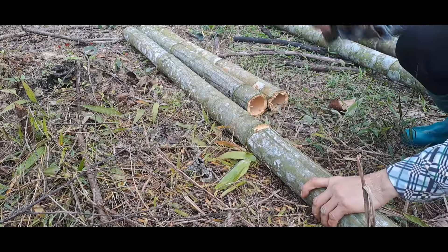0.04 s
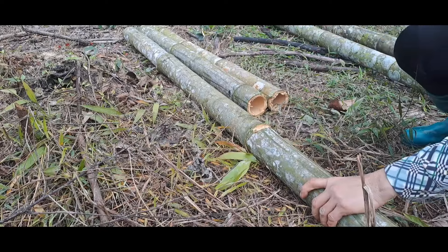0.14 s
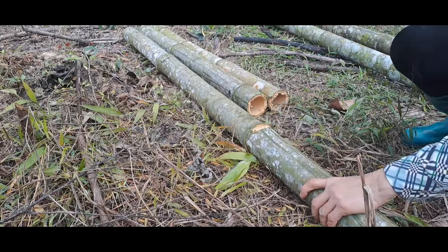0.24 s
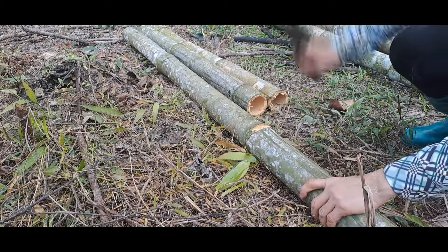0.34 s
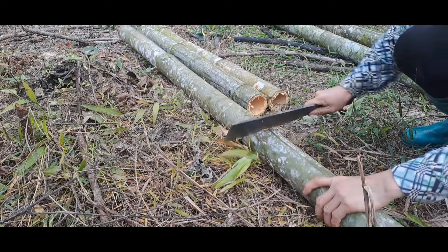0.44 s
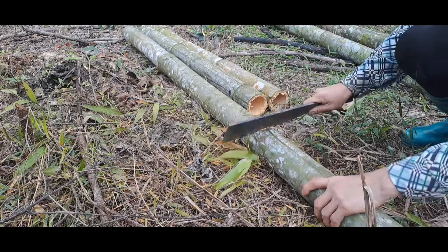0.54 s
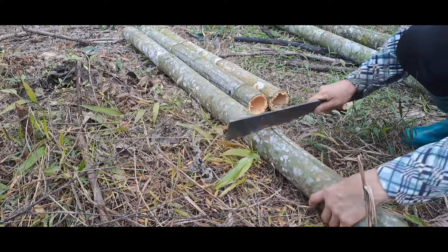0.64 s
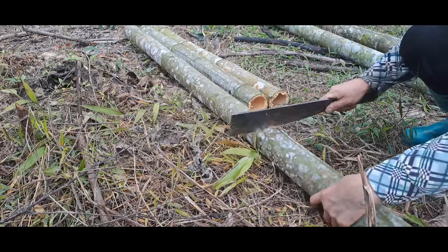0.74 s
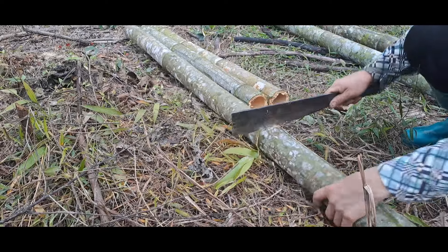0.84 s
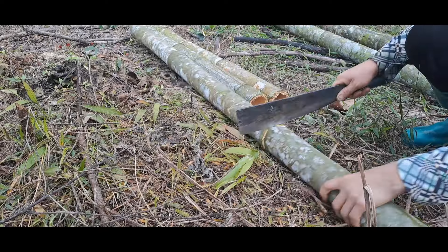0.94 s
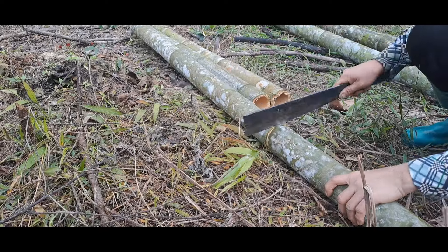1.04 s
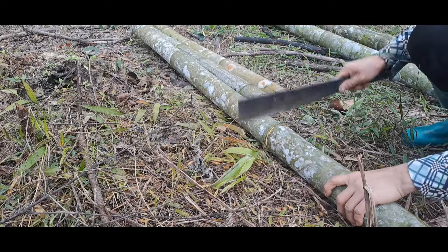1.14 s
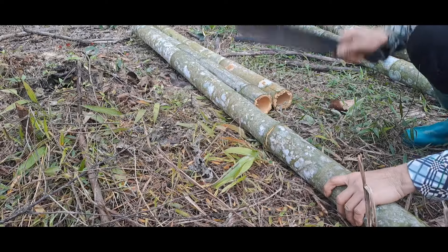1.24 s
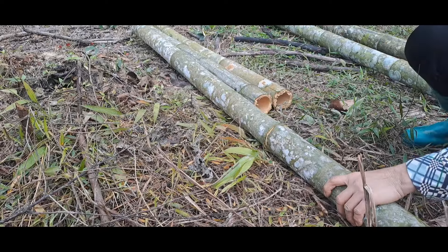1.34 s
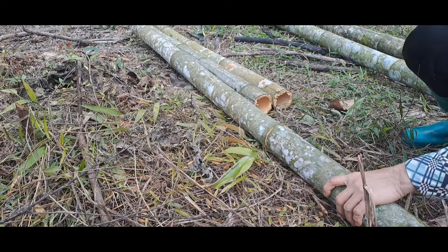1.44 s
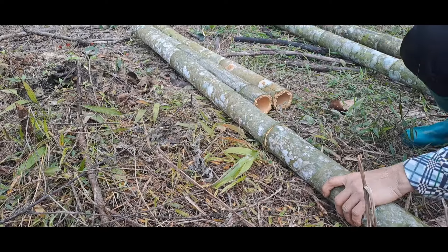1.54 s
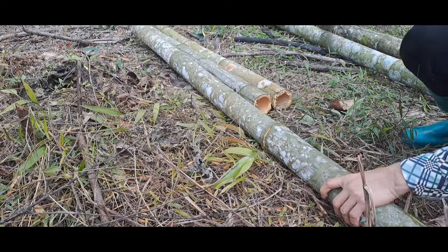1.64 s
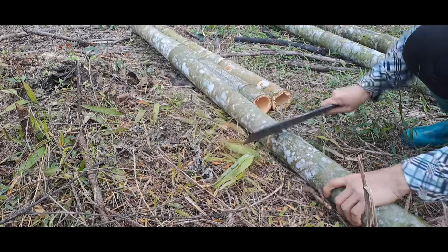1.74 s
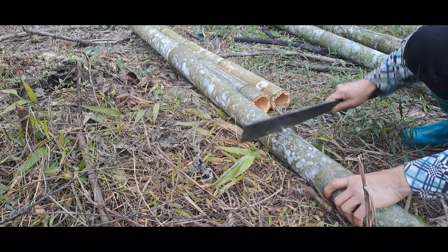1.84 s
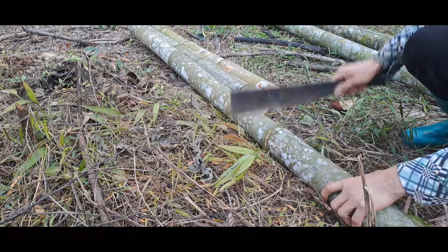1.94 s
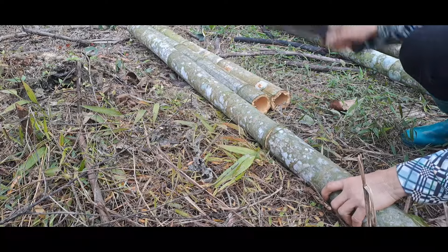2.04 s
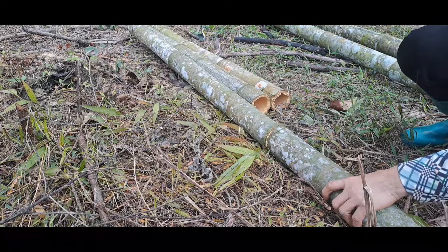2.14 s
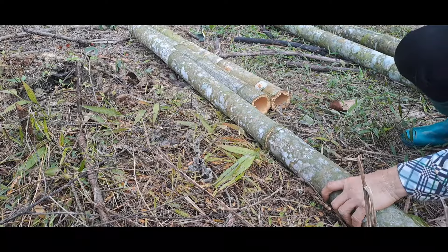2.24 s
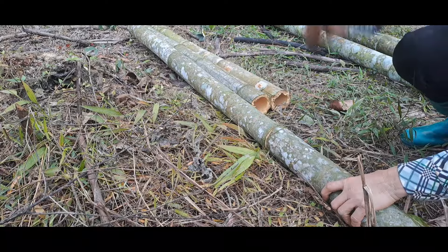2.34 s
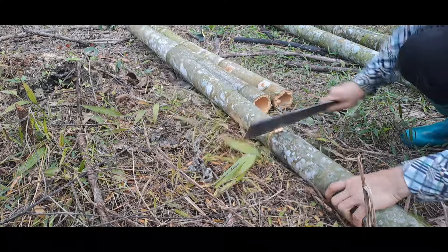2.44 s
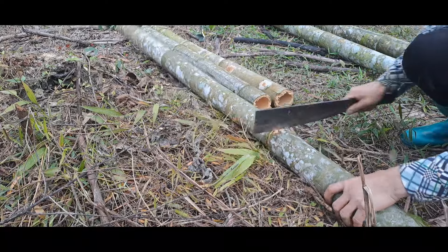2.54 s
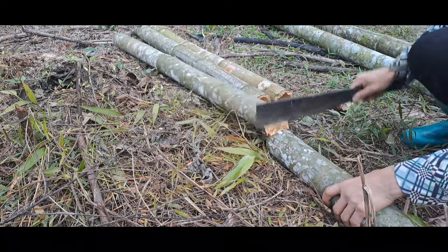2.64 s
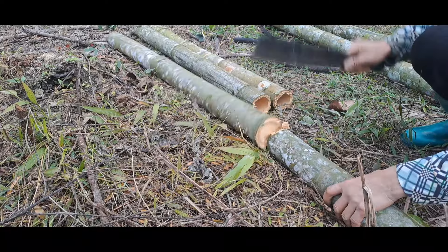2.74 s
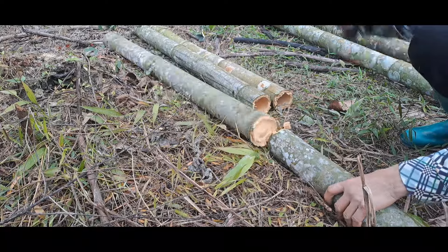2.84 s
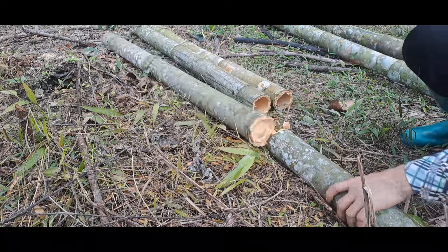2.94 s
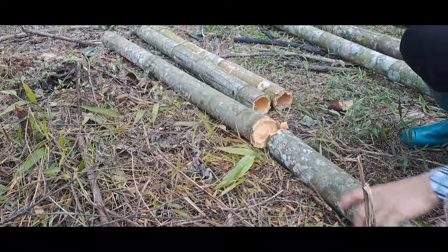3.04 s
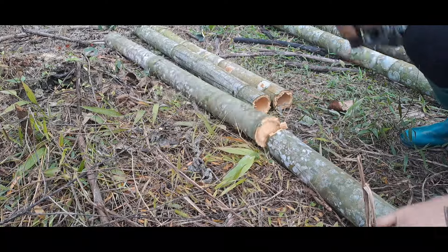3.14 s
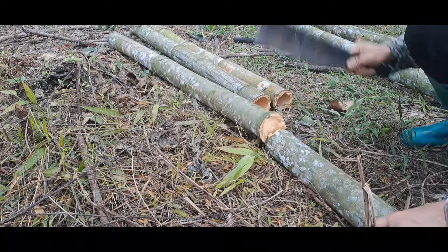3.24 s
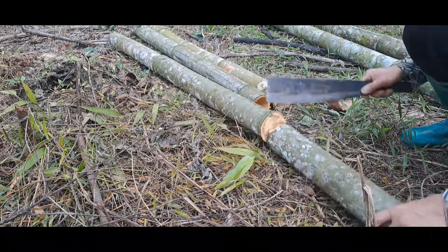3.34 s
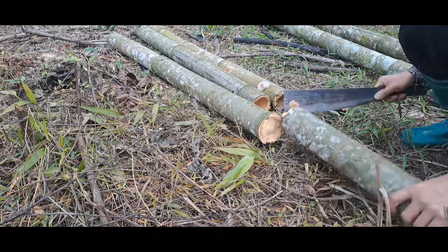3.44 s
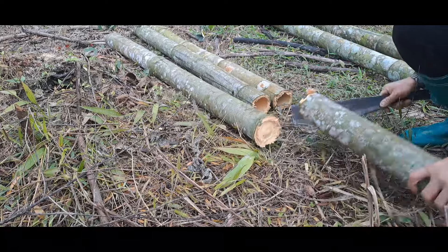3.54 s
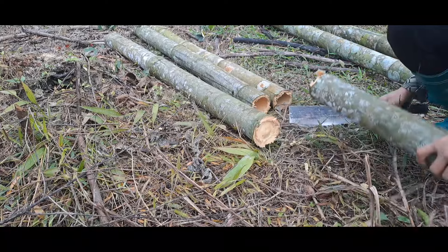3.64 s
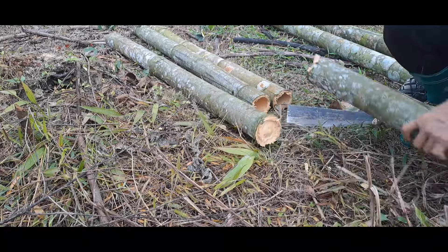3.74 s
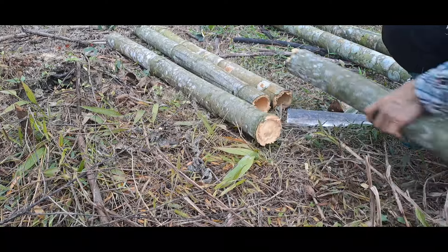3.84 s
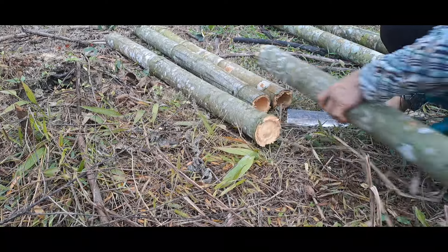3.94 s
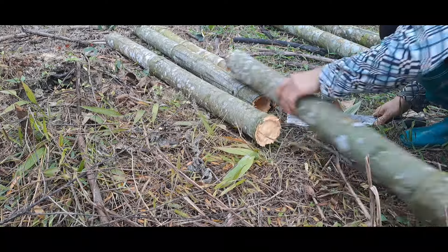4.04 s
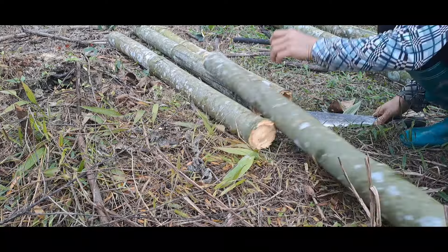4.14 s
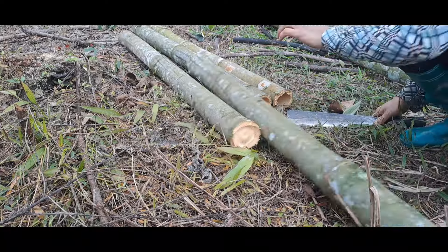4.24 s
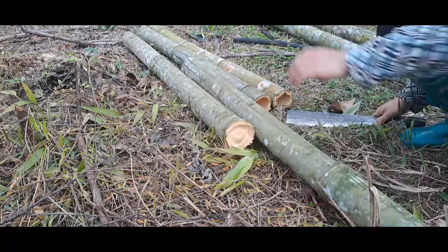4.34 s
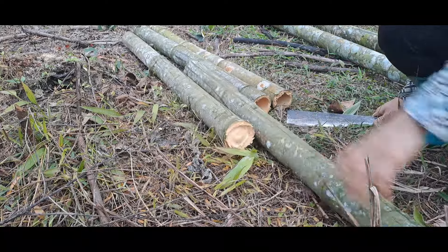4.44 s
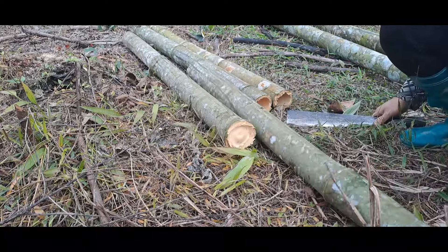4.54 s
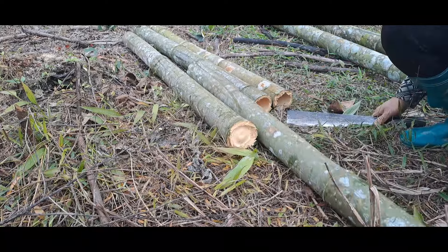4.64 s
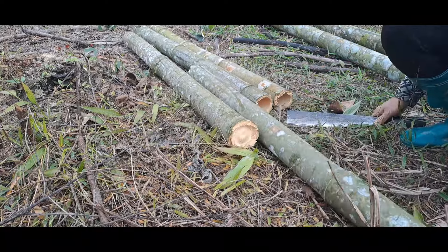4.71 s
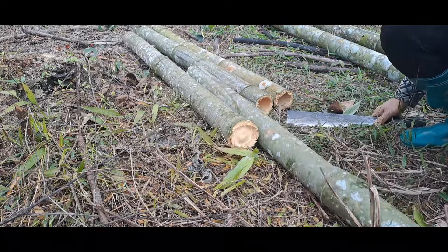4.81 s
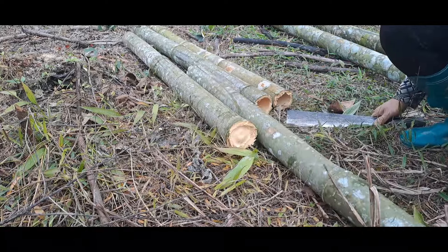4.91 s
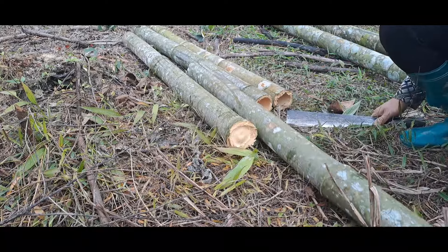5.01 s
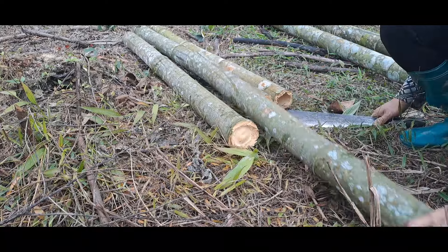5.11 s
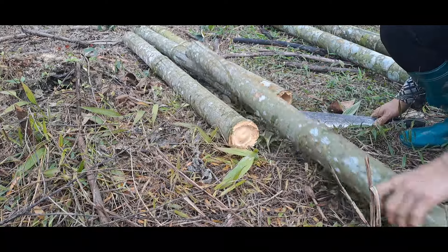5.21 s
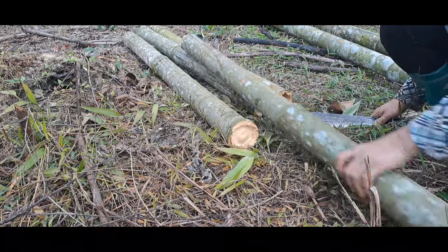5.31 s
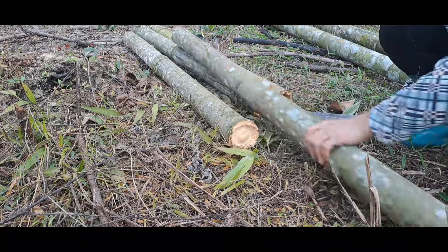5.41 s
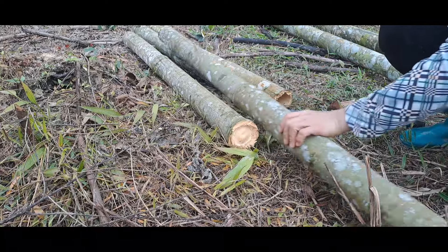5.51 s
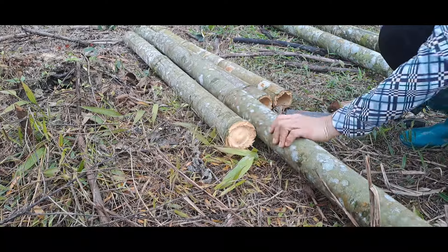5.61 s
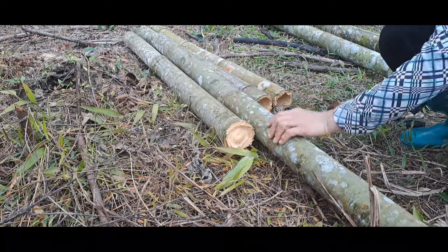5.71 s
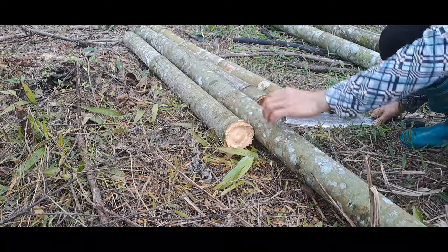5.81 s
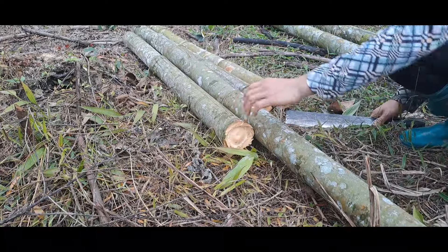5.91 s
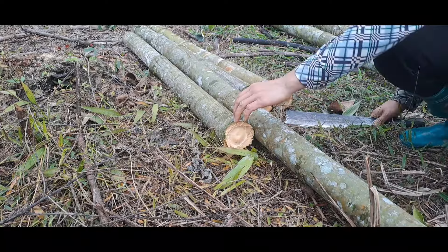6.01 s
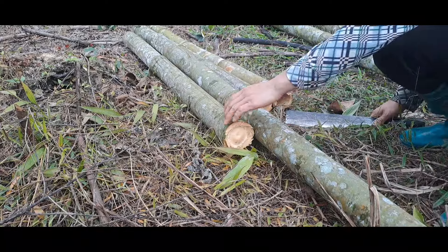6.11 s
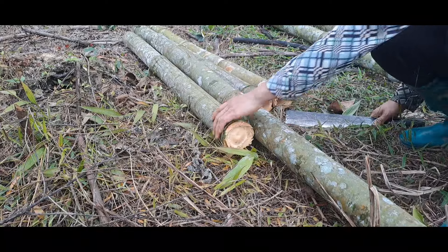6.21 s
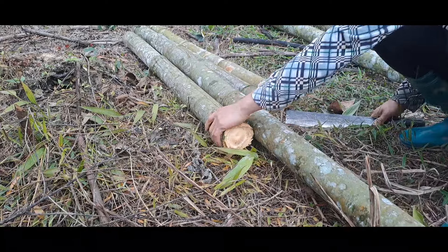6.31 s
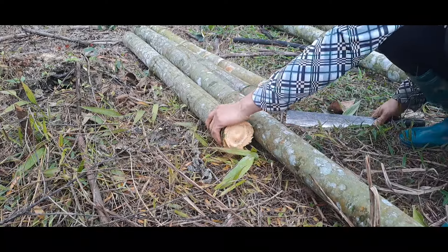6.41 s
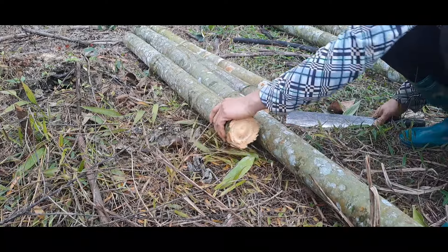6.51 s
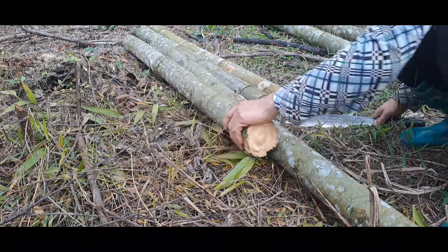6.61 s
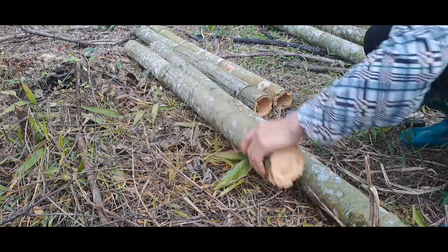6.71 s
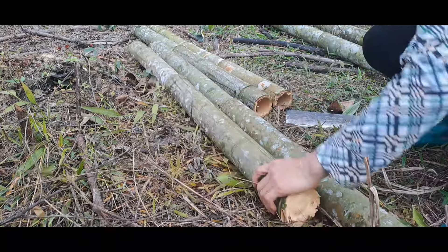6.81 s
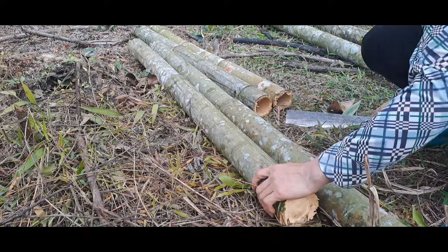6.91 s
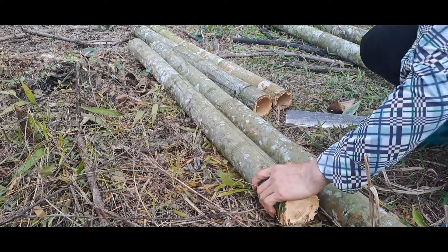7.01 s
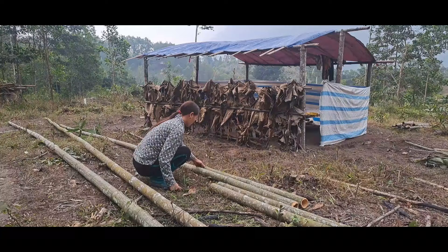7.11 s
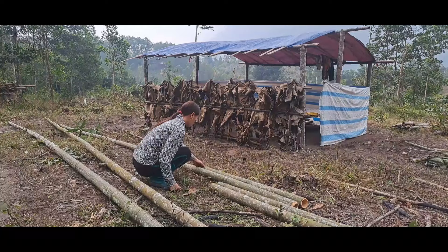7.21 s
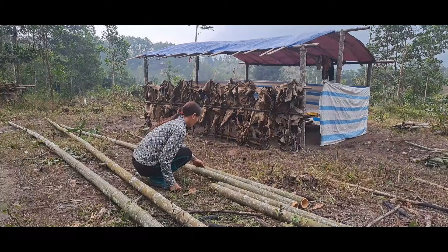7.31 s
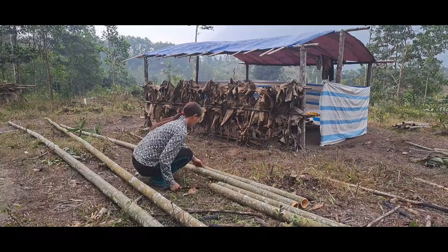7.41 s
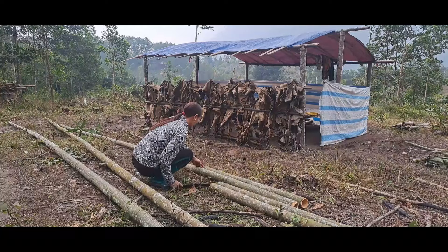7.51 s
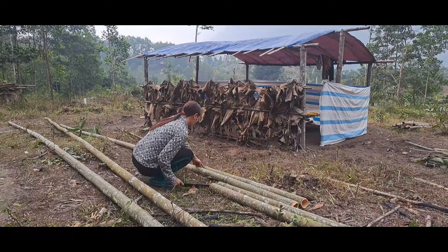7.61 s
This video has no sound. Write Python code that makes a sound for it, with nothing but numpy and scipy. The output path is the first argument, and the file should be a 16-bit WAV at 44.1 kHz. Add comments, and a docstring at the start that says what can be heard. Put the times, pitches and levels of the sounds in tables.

```python
"""Still outdoor air and insect hiss lie under a stir of leaves; then a machete chops a green bamboo pole.
Each blow cracks the skin and tears fibres as shaped noise; decaying modes ring the wall and the hollow tube.
The cut length then clatters, rubs and slides on the pile: ticks, modal knocks, stick-slip trains and scrape.
Dry leaves and stalks crackle as modulated noise and pings, twigs snap as short noise bursts,
and the slope returns a faint wash by convolution with decaying noise."""
import sys
import numpy as np
from scipy import signal
from scipy.fft import rfft, irfft, next_fast_len
from scipy.io import wavfile

SR = 44100
rng = np.random.default_rng(int(sys.argv[2]) if len(sys.argv) > 2 else 0)


def dump(signal):
    """Clip the signal to [-1, 1] and save it as 16-bit WAV at the path in sys.argv[1]."""
    limited = np.clip(np.atleast_2d(signal).T, -1, 1)
    pcm = np.round(limited * 32767).astype(np.int16)
    wavfile.write(sys.argv[1], SR, pcm)


N = 337806
TIME = np.arange(N) / SR  # s, whole scene
AGE = np.arange(24576) / SR  # s since an event; a struck sound is computed for this long

# Background
# spectrum of still outdoor air: frequency_hz, level_db_per_hz
AIR_COLOUR = [(25, -18), (55, -9), (90, -7.5), (230, -11), (450, -20.5), (1000, -26), (2000, -23.5),
              (4000, -21), (5400, -27.5), (10000, -33), (15500, -41.5)]
# spectrum of the steady hiss of distant insects: frequency_hz, level_db_per_hz
INSECT_COLOUR = [(5600, -20), (6400, -3.5), (6850, 2.5), (7300, -4.5), (8000, -19.5)]
AIR_DB, INSECTS_DB = -74, -80.5
# faint tones that slide upward: start_s, length_s, start_hz, end_hz, level_db
RISING_TONES = [(1.579, 0.087, 378, 540, -60), (7.557, 0.11, 270, 806, -64)]
# colour of the left port against the right: frequency_hz, left_minus_right_db
PORT_COLOUR = [(30, 1.4), (150, 0.45), (300, 0.3), (550, 2.7), (1100, -0.8), (2200, -1.7), (4500, -2),
               (8000, -1.5), (12000, -4), (16000, 3.5)]
TOP_HZ = 15700

# Leaf litter and sliding
# pushes that stir the litter as the pole is jolted, lifted, slid or rolled; the drives precede the litter mix:
# full_strength_s, attack_s, hold_s, release_s, leaves_drive_db, scrape_drive_db
LITTER_PUSHES = [(0, .05, 0, .17, -54.5, -72), (.72, .2, .05, .38, -60.5, -61),
                 (1.18, .15, .05, .2, -64, -72), (1.5, .2, .1, .3, -73.5, -90),
                 (1.92, .08, .02, .16, -47.5, -52), (2.6, .08, .07, .11, -47, -54),
                 (2.8, .1, .02, .35, -62, -70), (3.04, .15, .06, .25, -62.5, -68),
                 (3.25, .16, .01, .1, -53.5, -72), (3.56, .2, .03, .3, -62, -67),
                 (3.77, .35, .2, .3, -56, -51), (4.08, .5, .08, .15, -50.5, -40.5),
                 (4.21, .12, .03, .2, -37.5, -36), (4.67, .5, .22, .25, -54, -57),
                 (5.14, .22, .1, .2, -51.5, -46), (5.36, .13, .05, .24, -45.5, -40.5),
                 (5.54, .1, .22, .17, -51.5, -41.5), (5.85, .1, .08, .2, -63, -66),
                 (6.1, .22, .08, .12, -51.5, -57), (6.3, .08, .05, .2, -57, -62),
                 (6.68, .27, .01, .14, -42.5, -43), (6.86, .13, .04, .2, -43, -48),
                 (7.2, .2, .1, .2, -56, -72), (7.62, .5, .04, .2, -65, -80)]
PUSH_RANGE_DB = 20  # rise over the attack, and fall over the release
SHAKE_DB, SHAKE_T60_S = -53, .85  # leaf drive after a chop, relative to its crack, and its decay
STRAY_LEAVES_DB = -84  # constant leaf drive
# spectrum of rustling leaves: frequency_hz, level_db_per_hz
LEAF_COLOUR = [(450, -5.5), (800, -6.5), (1200, -7.5), (2000, -4), (4500, -3.5), (7000, -3.5),
               (8400, -10.5), (11700, -4.5), (15500, -11)]
# spectrum of the sliding pole: frequency_hz, level_db_per_hz
SCRAPE_COLOUR = [(30, -23.5), (45, -6.5), (70, 1), (130, -3.5), (200, -1), (320, -3), (480, -3), (760, 1),
                 (1100, -11), (1800, -12.5), (3200, -21.5)]
# sleeve and hand brushing along the pole: start_s, length_s, level_db
CLOTH_BRUSHES = [(3.791, 0.25, -49), (6.055, 0.21, -46.5), (6.824, .13, -46)]
# spectrum of brushing cloth: frequency_hz, level_db_per_hz
CLOTH_COLOUR = [(1500, -12), (4000, -16), (7000, -1.5), (8500, -3), (12000, 3.5), (15500, 2)]
# the cut length rubbing over other poles: start_s, length_s, level_db, wall_pitch_hz, grating_relative_db
POLE_RUBS = [(5.16, .08, -51, 800, 0), (5.314, .06, -37.5, 400, -6), (5.335, .1, -40, 700, 5),
             (5.415, .07, -44, 620, 1), (5.48, .075, -41.5, 1200, 1), (6.535, .06, -51, 760, -3),
             (6.655, .045, -44, 830, 2), (6.865, .05, -45, 380, -2)]
# spectrum of the grating skin: frequency_hz, level_db_per_hz
GRATE_COLOUR = [(500, -8), (1200, -3), (1800, 3), (2300, -3), (3200, -10), (5000, -15), (8000, -28)]
RUB_PER_S, RUB_SPREAD_DB = 450, 16
RUB_DAMPED_SHARE = .35  # pressed poles ring for this share of the free decay time
# dry stalks crushed under a pole: start_s, length_s, level_db, centre_hz
STALK_CRUNCHES = [(3.84, .1, -58, 3000), (4.03, .1, -54, 2400), (4.18, .02, -32, 4000),
                  (4.208, .05, -35, 3000), (4.255, .025, -36, 4500), (4.312, .016, -41, 5200),
                  (5.345, .08, -49, 3600), (6.658, .02, -38, 3500), (6.672, .022, -37, 4000),
                  (6.782, .03, -44, 4800), (6.865, .055, -45, 6000)]
# spectrum of a crushed stalk: multiple_of_centre, level_db_per_hz
STALK_COLOUR = [(.2, -14), (.45, -2), (1, 0), (1.6, -4), (2.1, -16), (3.6, -23)]
CRUNCH_PER_S, CRUNCH_SPREAD_DB, CRUNCH_T60_S = 240, 22, .024

# Snapping
# the loudest twigs and splinters: start_s, level_db (before the lift in snap), centre_hz
TWIG_SNAPS = [(0.513, -35.5, 11000), (1.091, -33, 6200), (1.9695, -29.5, 4800), (2.598, -34, 4410),
              (2.7233, -45, 8470), (2.79, -50, 5500), (4.2137, -30, 5500), (4.26, -31, 5200),
              (4.5326, -44.5, 9000), (4.737, -40, 7500), (7.1108, -48, 3800)]
# slivers parting after each chop: level relative to its crack (before the lift in snap), middle pitch, span, fall
SPLINTER_DB, SPLINTER_HZ, SPLINTER_SPAN_S, SPLINTER_FALL_DB_PER_S = -29, 5500, .34, 90

# Struck pole
# air-column and bending modes of the whole pole: frequency_hz, level_db, t60_s
WHOLE_POLE_MODES = [(81, -11, .6), (135, -15, .35), (186, -5, .5), (209, -4, .48), (250, -3, .16),
                    (294, -3, 0.22), (332, .5, 0.32), (378, -1, .22), (428, -1.5, 0.22), (480, -4, 0.24),
                    (580, -6, .18), (650, -8, .18), (713.7, -7, 0.14), (797, -3, 0.2), (980, -9.5, 0.08),
                    (1330, -12, 0.07), (1414, -10, 0.1), (1560, -13, .1), (1800, -14, .09),
                    (2100, -16, .08), (2450, -18, 0.07), (3080, -14.5, 0.06), (4500, -19.5, .08)]
# modes of the cut length: frequency_hz, level_db, t60_s
CUT_POLE_MODES = [(160, -5.5, 0.3), (228, 1.5, 0.38), (246, -4, .34), (284.2, 0, 0.22), (355, -2, 0.33),
                  (403, -2, 0.25), (440, -3, .3), (516, -10, 0.24), (590, -9, 0.13), (636, -2, 0.16),
                  (705, -5, 0.13), (800, -6.5, .17), (866, -16, 0.14), (1175, -17, 0.16), (1404, -22, 0.06),
                  (1800, -26, 0.08)]
# short-lived wall modes near the struck spot: multiple_of_clack_pitch, level_db, t60_s
WALL_MODES = [(0.572, -8.5, 0.077), (0.799, -1, .11), (1, 0.5, .12), (1.118, -7, 0.12), (1.27, -5.5, 0.069),
              (1.548, -12, 0.099), (2.05, -17, 0.056), (2.7, -21.5, 0.1), (3.601, -22, .07)]
# the hard skin rings briefly at a touch: frequency_hz, level_db, t60_s
SKIN_MODES = [(1175, -3, .06), (1390, 0, .05), (1445, -2, .05), (1780, 0, .045), (1890, -2, .045),
              (2170, -2, .04), (2550, -3, .04), (2870, -3, .035), (3300, -5, .035)]
SKIN_DB = -9  # relative to the tick
# spectrum of a contact tick: frequency_hz, level_db_per_hz
TICK_COLOUR = [(90, -6.5), (300, -5.5), (600, -8.5), (1300, 3), (2000, 2), (3000, -1.5), (5000, -4.5),
               (7000, -8), (9000, -16), (16000, -15.5)]
# ground thud under the whole pole: frequency_hz, level_db_per_hz
WHOLE_THUD_COLOUR = [(20, -32), (38, -15.5), (54, 3), (75, -1), (105, -4.5), (160, 1), (230, -6),
                     (400, -18.5), (1000, -46.5)]
# ground thud under the lighter cut length: frequency_hz, level_db_per_hz
CUT_THUD_COLOUR = [(22, -23.5), (38, -22), (57, -3.5), (80, -4.5), (110, -5.5), (165, -4), (230, -6.5),
                   (400, -17), (1000, -43)]
HELD_T60_S = .22  # the last length is set down in the hand, which shortens its ring
# light knocks of the slide: middle clack pitch, then levels relative to the scrape drive
BUMP_HZ, BUMP_TICK_DB, BUMP_CLACK_DB, BUMP_RING_DB, BUMP_THUD_DB = 760, -11, -7, -5, -13
# hollow sections rung by hard blows: start_s, lower_tone_hz, upper_tone_hz, tones_db, tones_t60_s,
# cluster_bottom_hz, cluster_top_hz, cluster_db
SECTION_RINGS = [(.483, 755, 803, -17, .11, 2750, 4600, -22), (1.044, 825, 915, -31, .11, 2330, 2700, -39),
                 (1.804, 795, 845, -18, .11, 1250, 1750, -26), (2.512, 332, 366, -20, .36, 1750, 2150, -22),
                 (4.1695, 1300, 1620, -18, .04, 1780, 3200, -20),
                 (4.583, 775, 835, -25, .2, 1800, 2650, -22.5),
                 (4.7379, 1170, 1385, -19.5, .085, 950, 1450, -22),
                 (5.0323, 750, 815, -31, .11, 1800, 3300, -34),
                 (5.6764, 755, 905, -20, .1, 1010, 2060, -17.5)]
CLUSTER_T60_S, SECTION_RISE_S = .04, .0005
# pole against pole or ground: start_s, tick_db, tick_edge_hz, clack_db, clack_pitch_hz, ring_db, thud_db,
# first_rebound_gap_s (0 if it stays down), first_rebound_clack_db
POLE_KNOCKS = [(-0.06, -42, 4000, -48, 555, -35, -36, 0, 0),
               (0.4945, -17, 4990, -18, 793, -32, -32, .02, -29),
               (0.54, -31, 2600, -35, 760, -38, -32, 0, 0), (0.5605, -30, 2000, -28, 760, -34, -32, 0, 0),
               (1.09, -70, 900, -46, 400, -40, -42, 0, 0), (0.715, -70, 2000, -50, 480, -49, -49, 0, 0),
               (1.868, -47.5, 2974, -34, 610, -29, -40, 0, 0),
               (1.904, -34, 1700, -29.5, 720, -26, -45, 0, 0), (1.935, -52, 2000, -31, 470, -34, -41, 0, 0),
               (1.958, -60, 1500, -35, 440, -40, -46, 0, 0), (2.008, -75, 1200, -50, 420, -44, -40, 0, 0),
               (2.521, -12, 6800, -23, 723, -21, -27, .031, -30),
               (2.538, -32, 2000, -24, 640, -26, -26, 0, 0), (2.571, -30, 4000, -27, 760, -27, -42, 0, 0),
               (2.609, -34, 1300, -30, 500, -29, -44, 0, 0), (2.672, -40, 1700, -45, 620, -39, -42, 0, 0),
               (3.541, -69, 2000, -57, 930, -64, -75, 0, 0), (3.693, -58, 2500, -46, 710, -47, -48, 0, 0),
               (4.1695, -13.5, 5000, -26, 1550, -32, -40, 0, 0),
               (4.179, -31, 5000, -31, 660, -28, -47, 0, 0), (4.225, -39, 3000, -28, 720, -26, -25, 0, 0),
               (4.244, -24, 2600, -27, 854, -25, -37, 0, 0), (4.2568, -26, 1200, -13, 650, -22, -50, 0, 0),
               (4.274, -30, 1300, -17, 740, -18, -39.5, .018, -24),
               (4.293, -50, 1200, -25, 300, -21, -32, 0, 0),
               (4.338, -49, 1200, -37, 460, -27, -44.5, .044, -39),
               (4.422, -52, 1480, -42, 883, -41.5, -40.5, 0, 0),
               (4.583, -20.5, 2900, -29, 844, -29, -29, .031, -30),
               (4.7335, -30, 1400, -25, 649, -32, -45, 0, 0),
               (4.7379, -23, 1300, -18, 690, -25, -32, .018, -24),
               (4.752, -45, 1200, -22, 410, -28, -38, 0, 0), (4.771, -38, 1400, -22, 690, -32, -38, 0, 0),
               (4.968, -49, 1520, -50, 945, -70, -70, 0, 0), (5.0323, -30, 3600, -34, 785, -33, -38, 0, 0),
               (5.206, -48, 2000, -46, 750, -42, -51, 0, 0), (5.521, -31, 2500, -37, 1250, -48, -48, 0, 0),
               (5.535, -37, 1400, -33, 900, -40, -48, 0, 0), (5.547, -40, 1494, -31, 693, -30, -33, 0, 0),
               (5.6764, -15, 1800, -22, 990, -31, -33, 0, 0), (6.161, -72, 1010, -65, 697, -56, -52, 0, 0),
               (6.758, -70, 900, -40, 160, -50, -39, 0, 0), (6.802, -60, 900, -36, 450, -34, -32, 0, 0),
               (6.811, -40, 1200, -30, 720, -35, -29, 0, 0), (6.825, -60, 900, -31, 160, -42, -27, 0, 0),
               (6.9184, -35, 1300, -23, 720, -29, -26, 0, 0), (7.037, -70, 700, -42, 700, -41, -43, 0, 0)]
# each rebound gap is shorter and each rebound weaker than the last
REBOUND_GAP_SHARE, REBOUND_LOSS_DB, REBOUND_PITCH_SHARE, REBOUND_EDGE_HZ = .9, 6, .86, 2200
REBOUND_TICK_DB, REBOUND_RING_DB, REBOUND_THUD_DB = -12, -1, -10  # relative to the rebound's clack

# Blade
# blows: start_s, crack_db, tear_db, tear_s, clack_db, clack_pitch_hz, ring_db, thud_db
BLADE_BLOWS = [(0.4821, -5, -20.5, 0.023, -21, 797, -19, -26.5),
               (1.044, -44, -50, 0.011, -30, 820, -51.5, -40),
               (1.8032, -9, -22, .03, -22, 650, -28.5, -34.5),
               (1.83, -12, -30, 0.0249, -20, 732, -25.5, -24.5),
               (2.5044, -9.5, -19.5, 0.027, -26.5, 800, -32, -28)]
# spectrum of the cracking skin: frequency_hz, level_db_per_hz
CRACK_COLOUR = [(200, -15.5), (700, -1.5), (1500, 2), (3000, -0.5), (4500, -0.5), (5300, -9), (6800, 0),
                (8000, -13), (12000, -12), (16000, -16.5)]
# spectrum of tearing fibres: frequency_hz, level_db_per_hz
FIBRE_COLOUR = [(300, -11.5), (600, 0), (850, 9.5), (1200, 2), (1800, 2.5), (3000, -6), (4500, -4.5),
                (5300, -11), (6800, -10), (8000, -20), (16000, -25.5)]


def amp(db):
    """A level in decibels corresponds to a gain of ten to the power of one twentieth of it."""
    return np.exp(np.asarray(db) * (np.log(10) / 20))


def fade(t60):
    """Free decay is exponential, falling 60 dB in the time t60."""
    return np.exp(-np.log(1000) * AGE / max(t60, 1e-3))


def swell(rise_s):
    """A vibration builds up exponentially towards its full strength."""
    return 1 - np.exp(-AGE / max(rise_s, 1e-5))


def add(out, s, sound):
    """Sounds superpose linearly from time s; one begun before zero is already ringing."""
    i = int(s * SR)
    out[:, max(i, 0):i + sound.shape[1]] += sound[:, max(-i, 0):N - i]


def ports(pair, wide_hz=700):
    """Two nearby microphone ports hear alike in the bass and apart in the treble."""
    hz = np.fft.rfftfreq(pair.shape[1], 1 / SR)
    side = irfft(rfft(pair[1]) * hz / np.hypot(hz, wide_hz), pair.shape[1])
    return np.array([pair[0] + side, pair[0] - side])


def grains(colour, size, spread_db=0, ripple_db=0, ripple_hz=150):
    """Noise of scattered strength is filtered by a colour and a ripple of chance resonances; rms 1."""
    # strength is held over runs of 16 samples
    strength = np.repeat(rng.exponential(size=size // 16 + 1), 16)[:size].clip(0, 6)
    noise = rng.standard_normal((2, size)) * amp(spread_db * strength)
    hz, db = np.transpose(colour)
    f = np.fft.rfftfreq(size, 1 / SR) + 1e-3
    peaks = rng.standard_normal(size=400)
    ripple = ripple_db * np.interp(f, ripple_hz * np.arange(len(peaks)), peaks)
    gain = amp(np.interp(np.log(f), np.log(hz), db) + ripple)
    gain *= np.minimum(f / hz[0], 1) ** 2 * np.minimum(hz[-1] / f, 1) ** 2  # roll-off beyond both ends
    x = ports(irfft(rfft(noise) * gain, size))
    return x / x.std()


def tube(modes, scatter_db=3.3, detune=.012, port_phase=1.0):
    """A struck body is a sum of decaying modes, weighted differently by every striking point."""
    hz, db, t60 = np.transpose(modes)[:, :, None]
    weight, shift, lag, phase = rng.standard_normal((len(hz), 4)).T[:, :, None]
    gain = amp(db + scatter_db * weight)
    pole = 2j * np.pi * hz * (1 + detune * shift) - np.log(1000) / t60
    # each exponential is the product of its value at a block's start and its course within a block
    blocks = AGE.reshape(128, -1)
    starts = gain * np.exp(pole * blocks[:, 0] + 1j * np.pi * phase)
    within = np.exp(pole * blocks[0])
    turn = np.exp(1j * port_phase * lag * hz / (hz + 900))  # each mode has its own phase at the two ports
    heard = np.array([((starts * t).T @ within).imag.ravel() for t in (turn, 1 / turn)])
    return heard / np.sqrt(np.sum(gain ** 2) / 2)


def catches(rate, depth_db):
    """Stick and slip make the gain uneven: random levels joined by straight lines in decibels."""
    steps = np.arange(0, 8, 1 / rate)
    return amp(depth_db * np.interp(TIME, steps, rng.standard_normal(len(steps))))


def slips(length, rate, spread_db, count=96):
    """Stick-slip is a train of uneven jerks, here swelling and dying away within the given time."""
    gap, strength = rng.random((count, 2)).T
    when = np.cumsum(.1 + 2.7 * gap ** 2) / rate
    arch = np.sin(np.pi * np.minimum(when / length, 1))
    train = np.zeros(len(AGE))
    index = np.minimum(when * SR, len(AGE) - 1).astype(int)
    np.add.at(train, index, arch * amp(spread_db * (strength - 1)))
    return train


def excite(train, response, length):
    """By convolution every jerk sounds the same body; rms 1 reckoned over the given time."""
    x = signal.fftconvolve(train[None], response, axes=1)[:, :len(AGE)]
    return x / np.sqrt(np.sum(x ** 2) / (2 * length * SR) + 1e-18)


def background():
    """Stationary filtered noise gives air and insects; growing frequency gives two faint rising tones."""
    size = next_fast_len(N)
    air = amp(AIR_DB) * grains(AIR_COLOUR, size)
    insects = amp(INSECTS_DB) * grains(INSECT_COLOUR, size)
    out = (air + insects)[:, :N]
    for s, length, start_hz, end_hz, db in RISING_TONES:
        u = np.linspace(0, 1, int(length * SR))
        hz = start_hz + (end_hz - start_hz) * u ** 3
        tone = np.sin(np.pi * u) * np.sin(2 * np.pi * np.cumsum(hz) / SR)
        add(out, s, amp(db) * tone[None])
    return out


def hillside(x):
    """Scatter from ground and trees is convolution with decaying noise: a faint wash, longer in the bass."""
    low = grains([(50, 6), (200, -1), (500, 2), (1200, -16)], len(AGE)) * fade(.75)
    high = grains([(500, -6.5), (1500, 1), (5000, 2.5), (15000, -10)], len(AGE), spread_db=3) * fade(0.6)
    echo = (amp(-40) * low + amp(-21.5) * high) * swell(.02) / np.sqrt(SR / 20)
    return signal.fftconvolve(x, echo, axes=1)[:, :N]


def stalks(count=2600, cycles=26, spread_db=3):
    """Many dry stalks tick as damped resonators, each at its own pitch from 700 to 7000 Hz; rms 1."""
    out, t = np.zeros((2, N)), AGE[:1024]
    for when, pitch, size, side in rng.random((count, 4)):
        hz = 700 * 10 ** pitch
        ping = np.sin(2 * np.pi * hz * t) * np.exp(-np.pi * hz * t / cycles) * np.sqrt(hz)
        strength = amp(-spread_db * np.log(size + 0.004))
        port_gains = [np.cos(3 * side - .7), np.sin(3 * side - .7)]
        add(out, when * N / SR, strength * np.outer(port_gains, ping))
    return out / out.std()


def pushes():
    """Independent pushes and shakes add in power, giving the drives of leaf rustle and pole scrape."""
    t = TIME[::64]
    s, attack, hold, release, leaves_db, scrape_db = np.transpose(LITTER_PUSHES)[:, :, None]
    before = np.maximum(s - t, 0) / np.maximum(attack, .01)
    after = np.maximum(t - s - hold, 0) / np.maximum(release, .01)
    shape_db = -PUSH_RANGE_DB * np.minimum(before + after, 10)
    leaves = np.interp(TIME, t, np.sum(amp(leaves_db + shape_db) ** 2, axis=0))
    scrape = np.interp(TIME, t, np.sum(amp(scrape_db + shape_db) ** 2, axis=0))
    shaken = np.zeros((1, N))
    for start, crack_db, *_ in BLADE_BLOWS:
        add(shaken, start, (amp(crack_db + SHAKE_DB) * fade(SHAKE_T60_S)[None]) ** 2)
    return np.sqrt(leaves + shaken[0] + amp(STRAY_LEAVES_DB) ** 2), np.sqrt(scrape)


def litter(rustle, drag):
    """Friction noise is modulated by its drive: leaves and stalks crackle, the pole scrapes, cloth brushes."""
    size = next_fast_len(N)
    clumps = catches(45, 2.2)
    leaf_noise = grains(LEAF_COLOUR, size, spread_db=1.0)[:, :N]
    leaves = (amp(-1.5) * leaf_noise + amp(-8) * stalks()) * rustle
    scrape = amp(-4.5) * grains(SCRAPE_COLOUR, size, spread_db=2)[:, :N] * drag
    out = (leaves + scrape) * clumps
    for s, length, db in CLOTH_BRUSHES:
        stroke = np.sin(np.pi * np.minimum(AGE / length, 1))
        add(out, s, amp(db) * grains(CLOTH_COLOUR, len(AGE)) * stroke)
    return out


def rubs():
    """Stick-slip of pole over pole: each slip rings the damped wall and grates on the skin."""
    out = np.zeros((2, N))
    for s, length, db, hz, grate_db in POLE_RUBS:
        modes = [(hz * ratio, level, t60 * RUB_DAMPED_SHARE) for ratio, level, t60 in WALL_MODES]
        wall = tube(modes, scatter_db=2.5, detune=.03)
        grate = grains(GRATE_COLOUR, len(AGE), ripple_db=3) * fade(.015)
        train = slips(length, RUB_PER_S, RUB_SPREAD_DB)
        add(out, s, amp(db) * excite(train, wall + amp(grate_db) * grate, length))
    return out


def crunches(count=3, size=1024):
    """Dry stalks give way together, each a train of jerks exciting chance resonances of its own."""
    out = np.zeros((2, N))
    for s, length, db, hz in STALK_CRUNCHES:
        colour = [(hz * ratio, level) for ratio, level in STALK_COLOUR]
        for _ in range(count):
            stalk = grains(colour, size, ripple_db=4, ripple_hz=260) * fade(CRUNCH_T60_S)[:size]
            train = slips(length, CRUNCH_PER_S, CRUNCH_SPREAD_DB)
            add(out, s, amp(db) * excite(train, stalk, length) / np.sqrt(count))
    return out


def snap(db, hz, size=2048):
    """Sudden fracture of a twig or sliver radiates a short, fast-decaying burst of coloured noise."""
    colour = [(hz / 5, -10), (hz * 0.23, -5), (hz, 0), (hz * 2.6, -8), (hz * 3, -14)]
    return amp(db + 3.5) * grains(colour, size, spread_db=-1.5) * fade(.021)[:size]


def snaps(count=7):
    """Brittle fracture comes in bursts: twigs break, and ever fainter slivers part after each chop."""
    out = np.zeros((2, N))
    for s, db, hz in TWIG_SNAPS:
        add(out, s, snap(db, hz))
    for s, crack_db, *_ in BLADE_BLOWS:
        for k, (when, pitch) in enumerate(rng.random((count, 2))):
            age = SPLINTER_SPAN_S * (k + when) / count
            db = crack_db + SPLINTER_DB - SPLINTER_FALL_DB_PER_S * age
            add(out, s + age, snap(db, SPLINTER_HZ * 2 ** (pitch - .5)))
    return out


def body(modes, ground, clack_db, clack_hz, ring_db, thud_db):
    """An impact excites coupled bodies: the wall clacks, the tube rings on, the ground thuds."""
    wall_modes = [(clack_hz * ratio, db, t60) for ratio, db, t60 in WALL_MODES]
    wall = tube(wall_modes, scatter_db=1.1, detune=0.016, port_phase=1.3)
    # the crowd of weaker modes along the pole, stepping down 8 dB just above the clack pitch
    hump = [(clack_hz / 4, -11), (clack_hz / 2, -4), (clack_hz, 0),
            (clack_hz, -8), (clack_hz * 1.5, -18), (clack_hz * 5, -34)]
    rattle = grains(hump, len(AGE)) * fade(.16) * swell(0.0039)
    clack = (wall * (0.88 + amp(-4.5) * fade(0.02)) + amp(-5) * rattle) * swell(0.00013)
    ring = tube(modes) * swell(0.0011) * (1 + amp(-9) * fade(0.06))  # with a brief extra strength early on
    thud_shape = fade(0.46) * swell(0.0026) + amp(-1) * fade(0.061) * swell(.0008)
    thud = grains(ground, len(AGE)) * thud_shape
    return amp(clack_db) * clack + amp(ring_db) * ring + amp(thud_db) * thud


def contact(s, tick_db, edge_hz, *pole, parted_s=3, held_s=6.7, size=8192):
    """Contact stiffness limits the treble of a touch: tick and skin clink, then the body, whole or cut."""
    def dull(hz):
        """A softer contact has a lower edge frequency and loses more treble."""
        return -10 * np.log10(1 + (hz / edge_hz) ** 5)

    tick = grains([(hz, db + dull(hz)) for hz, db in TICK_COLOUR], size, ripple_db=1.5)
    tick = tick * (fade(0.021) + amp(-21) * fade(.15))[:size]
    skin_modes = [(hz, db + dull(hz), t60) for hz, db, t60 in SKIN_MODES]
    skin = tube(skin_modes, scatter_db=2.5)[:, :size]
    if s < parted_s:
        sound = body(WHOLE_POLE_MODES, WHOLE_THUD_COLOUR, *pole)
    else:
        sound = body(CUT_POLE_MODES, CUT_THUD_COLOUR, *pole)
    if s > held_s:
        sound = sound * fade(HELD_T60_S)
    sound[:, :size] += amp(tick_db) * (tick + amp(SKIN_DB) * skin) * swell(.2 / edge_hz)[:size]
    return sound


def bumps(drag, start_s=4.8, end_s=6.7, count=7):
    """Sliding over nodes and stalks gives light chance impacts, in proportion to the scrape drive."""
    out = np.zeros((2, N))
    for k, (when, pitch) in enumerate(rng.random((count, 2))):
        s = start_s + (end_s - start_s) * (k + when) / count
        clack_hz = BUMP_HZ * 2 ** (pitch - .5)
        knock = contact(s, BUMP_TICK_DB, REBOUND_EDGE_HZ, BUMP_CLACK_DB, clack_hz, BUMP_RING_DB, BUMP_THUD_DB)
        add(out, s, np.interp(s, TIME, drag) * knock)
    return out


def sections(count=5):
    """A section not quite round splits its mode into a beating pair; a short cluster lies in a band of its own."""
    out = np.zeros((2, N))
    for s, low_hz, high_hz, db, t60, bottom_hz, top_hz, cluster_db in SECTION_RINGS:
        tones = tube([(low_hz, 0, t60), (high_hz, 0, t60)], scatter_db=.8, detune=.003, port_phase=.8)
        cluster_modes = [(hz, 0, CLUSTER_T60_S) for hz in np.geomspace(bottom_hz, top_hz, count)]
        cluster = tube(cluster_modes, scatter_db=1.5, detune=.015, port_phase=.8)
        add(out, s, (amp(db) * tones + amp(cluster_db) * cluster) * swell(SECTION_RISE_S))
    return out


def knocks(count=2):
    """Impact and restitution: the pole knocks; where a gap is given it rebounds twice, sooner and weaker."""
    out = np.zeros((2, N))
    for s, tick_db, edge_hz, clack_db, clack_hz, ring_db, thud_db, gap, db in POLE_KNOCKS:
        add(out, s, contact(s, tick_db, edge_hz, clack_db, clack_hz, ring_db, thud_db))
        for _ in range(count if gap > 0 else 0):
            s += gap
            rebound = contact(s, db + REBOUND_TICK_DB, REBOUND_EDGE_HZ, db, clack_hz * REBOUND_PITCH_SHARE,
                              db + REBOUND_RING_DB, db + REBOUND_THUD_DB)
            add(out, s, rebound)
            gap *= REBOUND_GAP_SHARE
            db -= REBOUND_LOSS_DB
    return out


def chops():
    """Fracture by the blade: the hard skin cracks, fibres tear for longer, and the whole pole is struck."""
    out = np.zeros((2, N))
    for s, crack_db, tear_db, tear_s, *pole in BLADE_BLOWS:
        crack = grains(CRACK_COLOUR, len(AGE), ripple_db=1.8, ripple_hz=306.3)
        crack = crack * swell(0.00025) * np.exp(-(AGE / .0035) ** 2)
        tear = grains(FIBRE_COLOUR, len(AGE), spread_db=3.0, ripple_db=2.0)
        tear = tear * swell(0.00077) * np.exp(-(AGE / tear_s) ** 2 / 2)
        struck = body(WHOLE_POLE_MODES, WHOLE_THUD_COLOUR, *pole)
        add(out, s, amp(crack_db) * crack + amp(tear_db) * tear + struck)
    return out


def scene():
    """Superposition of blows and handling close by, their scattered wash, the litter and the open air."""
    rustle, drag = pushes()
    blows = chops() + knocks() + sections() + snaps() + bumps(drag) + crunches() + rubs()
    return background() + hillside(blows) + litter(rustle, drag) + blows


def record(dry):
    """Filtering and saturation: port colours, a rumble cut, rounded high peaks and a steep treble cut."""
    size = next_fast_len(N)
    hz, db = np.transpose(PORT_COLOUR)
    tilt = np.interp(np.log(np.fft.rfftfreq(size, 1 / SR) + 1), np.log(hz), db)
    heard = irfft(rfft(dry, size) * amp(np.array([tilt, -tilt]) / 2), size)[:, :N]
    heard = signal.sosfilt(signal.butter(3, 36, "high", fs=SR, output="sos"), heard)
    treble_cut = signal.ellip(8, .2, 70, TOP_HZ, fs=SR, output="sos")
    return signal.sosfilt(treble_cut, np.tanh(heard))


dry = scene()
out = record(dry)
dump(out)
```